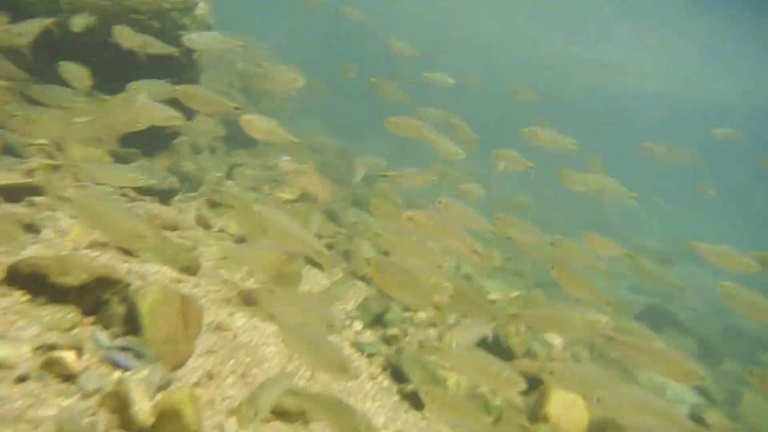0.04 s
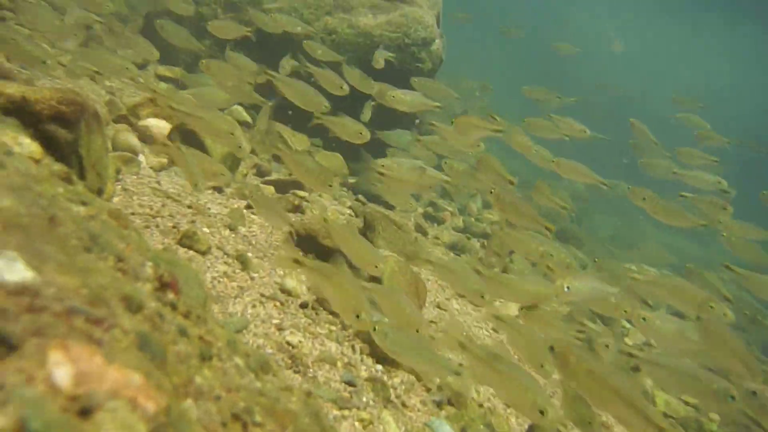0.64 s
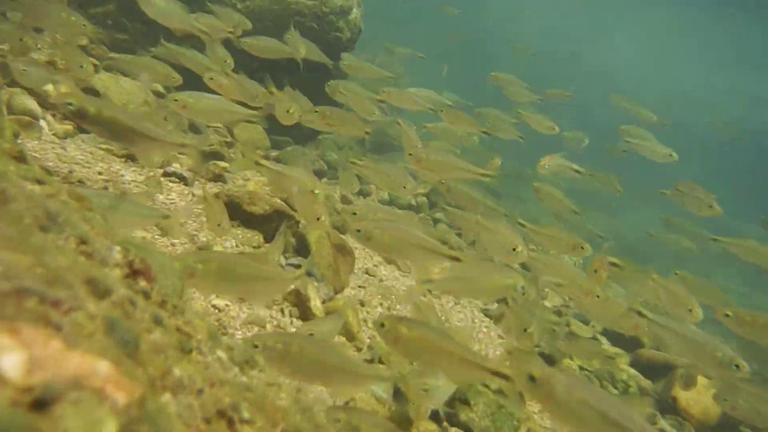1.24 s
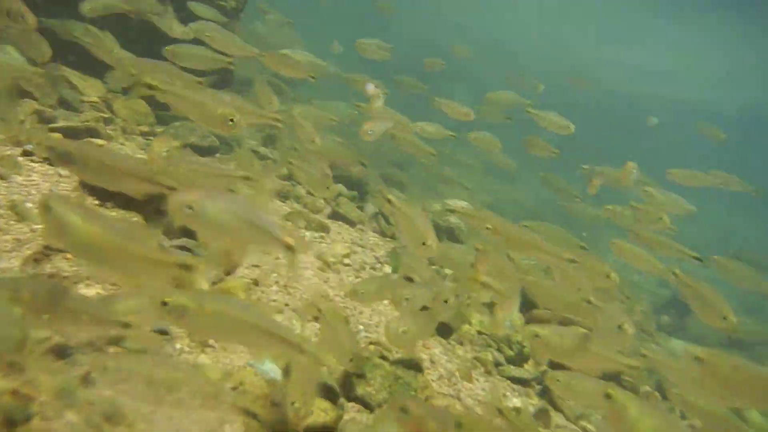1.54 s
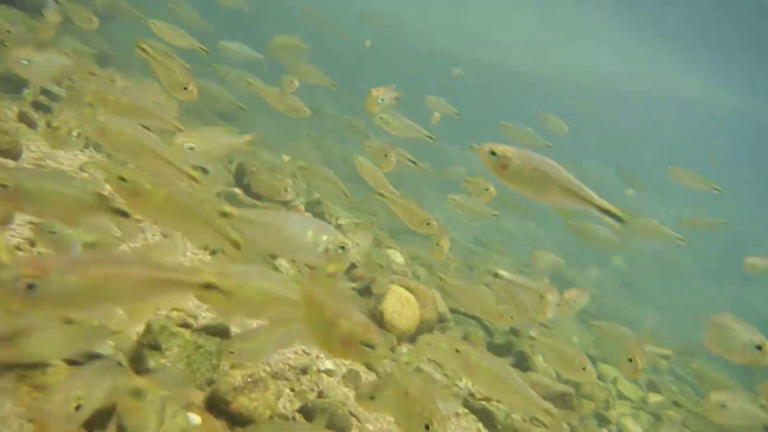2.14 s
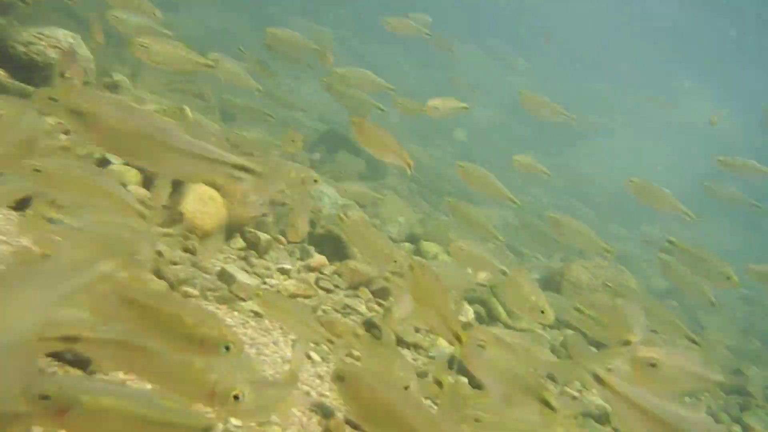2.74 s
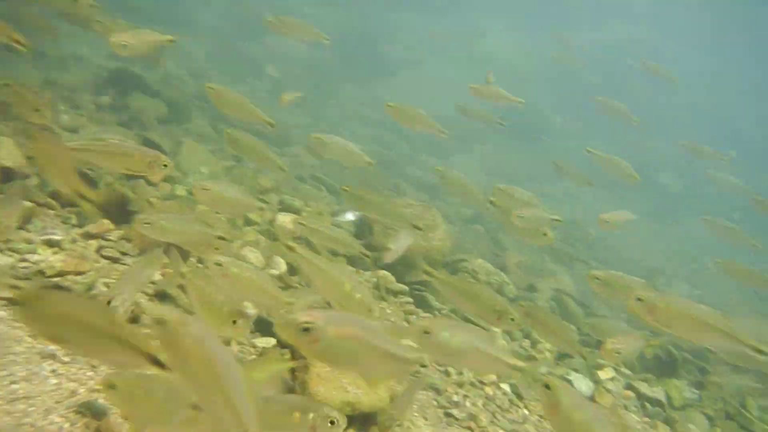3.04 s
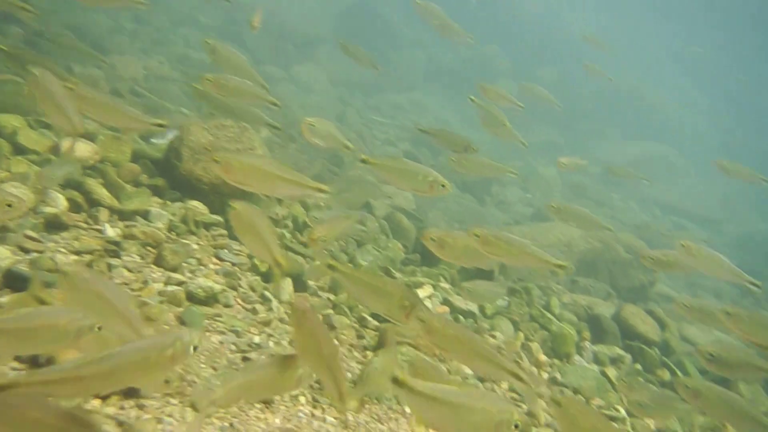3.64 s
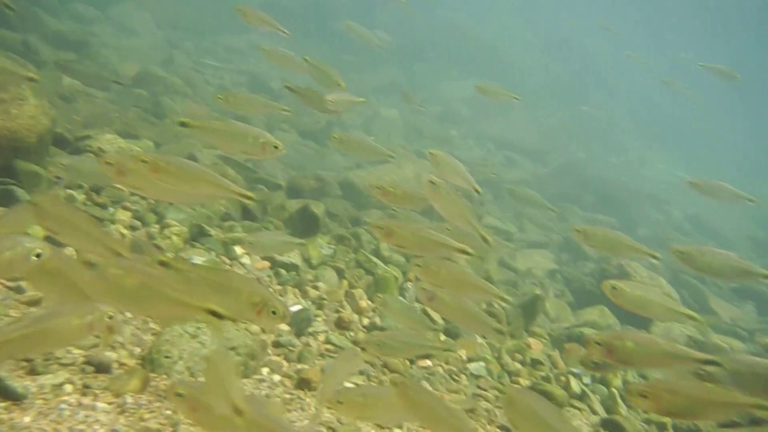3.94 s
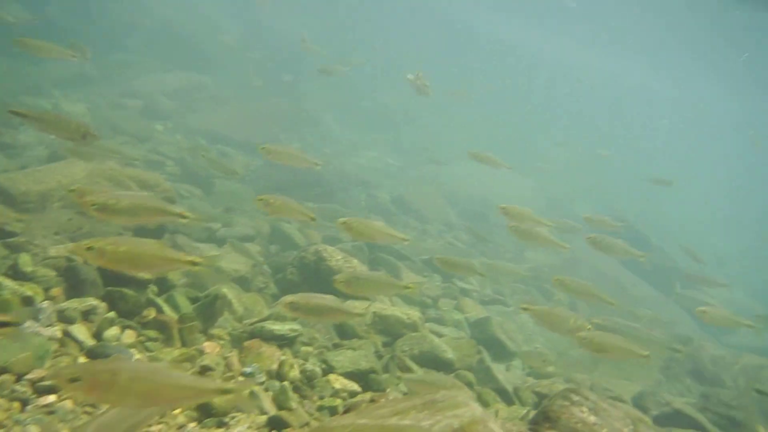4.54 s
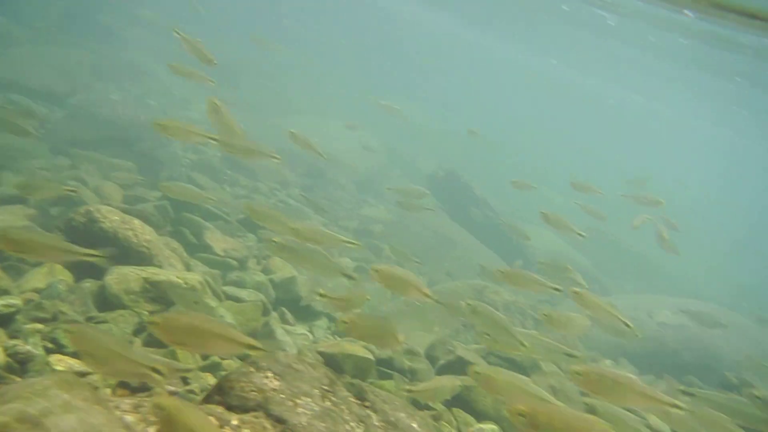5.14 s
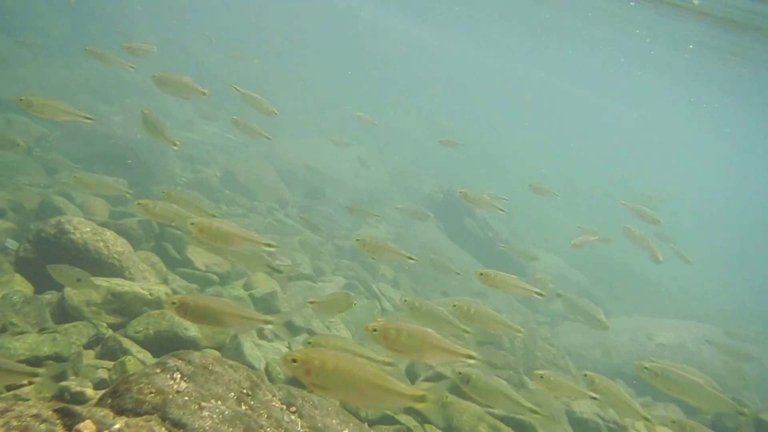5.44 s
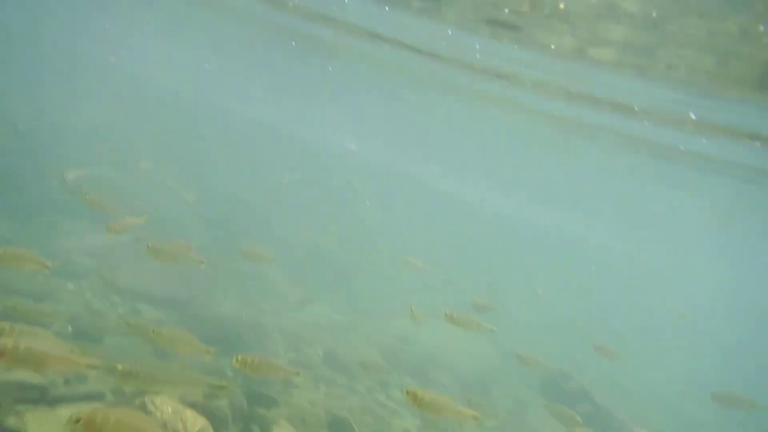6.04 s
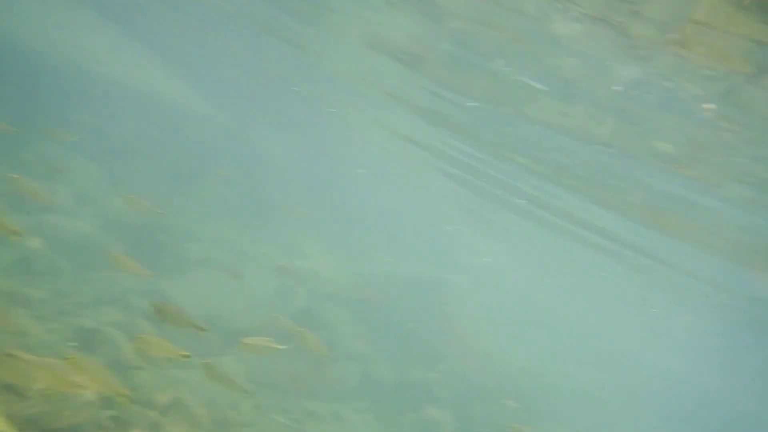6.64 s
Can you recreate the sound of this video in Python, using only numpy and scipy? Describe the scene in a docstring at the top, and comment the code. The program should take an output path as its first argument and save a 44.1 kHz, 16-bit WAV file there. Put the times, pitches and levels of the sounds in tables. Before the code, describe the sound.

Muffled underwater river wash with hollow knocks and rubbing on a camera case, then a small motor's low, rapid ticking in spells.

```python
"""Hollow knocks and surging rubbing on a waterproof camera case held in a shallow river.
Bumps, mostly from a shifting grip, the current's drag and lens motor steps ring its modes, differently
at each of two microphones. Water gulps, bubbles gurgle, pitched pops and taps ring, grit ticks and
scrapes, stones clink. Behind are a dull wash, thin hiss and, late on, a small motor's hum.
The heaviest knocks push the camera's gain down, and the rush creeps back after them."""
import sys
import numpy as np
from scipy import signal
from scipy.fft import rfft, irfft, next_fast_len
from scipy.io import wavfile
from scipy.ndimage import uniform_filter1d, minimum_filter1d, map_coordinates

SR = 44100
rng = np.random.default_rng(int(sys.argv[2]) if len(sys.argv) > 2 else 0)


def to_wav(s):
    """Save 16-bit WAV."""
    ch = np.atleast_2d(s).T  # columns
    pcm = np.round(np.clip(ch, -1, 1) * 32767)  # PCM
    wavfile.write(sys.argv[1], SR, pcm.astype(np.int16))


N = 299880
TIME_S = np.arange(N) / SR

# Each row: frequency in Hz, width in Hz, gain in dB at the left microphone, gain in dB at the right.
CASE_MODES = [(80.6, 14, -31, -33.5), (150, 14, -19.5, -19), (217.1, 55, -15.5, -13),
              (297, 130, -29.5, -16), (400.3, 63, -36.5, -9), (453, 65, -16, -3.5), (525, 32.7, 7, -27),
              (762, 170, -15, -12.5), (1164, 210, -5, -13.5)]
# Dull knocks on the case, including one hard lens motor step.
# Each row: start in seconds, level in dB, left-right bias in dB, hardness in Hz.
CASE_KNOCKS = [(0.024, -4.5, -15, 946), (0.322, 3.5, 13.5, 660), (0.395, -4.5, -5.5, 554),
               (0.461, 3, 0, 600), (0.488, -1.5, -5.5, 503), (0.529, -0.5, 14, 423), (0.603, 5, 0, 648),
               (0.652, 10.5, 12, 559), (0.673, 5.5, 0, 440), (1.064, 1, 0, 702), (1.083, -2.5, 6, 477),
               (1.138, 5.5, -6.5, 710), (1.174, 2, 15, 499), (1.191, -2.5, -2.5, 488),
               (1.249, 3.5, -7, 576), (1.263, 8.5, 8, 508), (1.317, 7.5, -3.5, 688), (1.338, 12, 0, 558),
               (1.562, 13, 5, 492), (2.479, -15, 7, 673), (2.532, -9.5, 1, 590), (3.529, -13, 5, 604),
               (3.997, -10, 15, 710), (4.75, -17, -0.5, 840), (4.945, -14, 9.5, 452), (5.013, -9, 3, 745),
               (5.062, -4.5, 12.5, 496), (5.228, -7.5, -33, 800), (5.241, -5, 12, 720),
               (5.698, -7.5, -7.5, 833), (6.433, -8.5, 20, 810), (6.449, -3.5, -14, 870)]
# Water or grip sliding. Each row: start and end in seconds, level in dB, left-right bias in dB.
RUB_SURGES = [(0.0, 0.009, -24, 5), (0.194, 0.456, -25, 2.5), (0.433, 0.573, -18.5, 4),
              (0.635, 0.679, -13, 3.5), (0.774, 0.838, -24.5, -3), (0.908, 0.918, -23, -5),
              (0.99, 1.276, -18, 3), (1.33, 1.406, -8.5, 3.5), (1.44, 1.542, -13.5, 3),
              (1.58, 1.714, -14, 2), (1.737, 1.888, -34.5, 2), (2.12, 2.253, -33, 2),
              (2.445, 2.541, -24, 2), (2.655, 2.995, -30.5, -4), (3.443, 3.65, -31, 2.5),
              (3.623, 3.872, -26, -7), (3.998, 4.15, -34, -1.5), (4.196, 4.275, -27, -6.5),
              (4.364, 4.502, -28.5, -10.5), (4.582, 4.926, -24, -2), (4.931, 5.045, -25.5, 0),
              (5.597, 5.722, -34.5, -4), (6.598, 6.809, -35, -4)]
# Each row: middle in seconds, peak in dB, pitch in Hz, length in seconds.
WATER_GULPS = [(0.328, -17.5, 201.6, 0.013), (0.505, -16, 157.6, 0.055), (0.555, -19.5, 105.3, 0.035),
               (0.676, -5.5, 175.6, 0.024), (0.821, -11, 181, 0.0095), (1.21, -17.5, 136.7, 0.017),
               (1.262, -15.5, 187, 0.031), (1.325, -15.5, 193.5, 0.028), (1.7, -15.5, 202.6, 0.041),
               (2.48, -24, 119, 0.019), (2.535, -25, 175.4, 0.044), (5.289, -26.5, 136.5, 0.0099),
               (6.458, -26, 90.5, 0.017)]
# Each row: start in seconds, level in dB, pitch in Hz, t60 in seconds.
PITCHED_POPS_AND_TAPS = [(0.014, -10, 1010, 0.0056), (0.322, -26, 1276, 0.022), (0.603, -13, 1087, 0.0089),
                         (0.639, -13, 1370, 0.01), (0.803, -16.5, 1273, 0.018), (1.061, -11.5, 1218, 0.039),
                         (1.138, -8, 1150, 0.036), (1.19, -16, 1136, 0.038), (1.249, -13.5, 1163, 0.046),
                         (1.314, -13.5, 1225, 0.054), (1.433, -11.5, 1190, 0.028), (1.492, -18, 1230, 0.04),
                         (1.56, -17.5, 1265, 0.018), (1.681, -11.5, 1175, 0.044), (2.578, -34, 1180, 0.03),
                         (5.697, -21.5, 727, 0.039), (5.813, -23.5, 1850, 0.011),
                         (6.447, -21, 1500, 0.0053)]
# Lens motor runs. Each row: start and end in seconds, level in dB.
STEP_SPELLS = [(0.026, 0.6, -15), (0.761, 1.0, -14), (1.811, 2.2, -15.5), (2.212, 2.7, -17.5),
               (2.712, 3.93, -16), (5.132, 5.99, -15), (6.199, 6.8, -17)]
# Each entry: time in seconds of a step that lands harder.
HARD_STEPS_S = [1.945, 2.012, 2.18, 2.446, 2.712, 2.846, 3.38, 5.165, 5.5, 5.966, 6.233, 6.366, 6.666]
# Each row: time in seconds, level in dB, clack offset in dB.
GRIT_HITS = [(0.156, -27, -6.5), (0.17, -30, -9), (0.323, -42, 7), (0.602, -36, 5.5), (0.616, -25.5, -7),
             (0.6396, -29, -8), (0.6566, -29.5, 2.5), (1.061, -42, 1.5), (1.1376, -32, 3),
             (1.1573, -29, -10.5), (1.3038, -33.5, -3), (1.3188, -28, 8.5), (1.3408, -26, -0.5),
             (1.5602, -30, 3), (1.9738, -39, -9), (2.0027, -34.5, -25.5), (5.1724, -41.5, -1),
             (5.2396, -36, 7.5), (5.5035, -40.5, -15.5), (5.8116, -55.5, 14.5), (6.368, -56, 10),
             (6.433, -55, 10.5), (6.449, -45, 3.5), (6.634, -57, 10.5)]
# Each row: start and end in seconds, level in dB.
SAND_SCRAPES = [(0.65, 2.3, -65.5), (0.367, 0.601, -64.5), (0.622, 0.687, -56), (1.223, 1.407, -62),
                (1.493, 1.579, -59), (1.612, 1.698, -47.5)]
# Each row: start in seconds, level in dB.
STONE_CLINKS = [(0.156, -35), (5.241, -23.5)]
# Each row: frequency in Hz, gain in dB, t60 in seconds.
STONE_MODES = [(1980, 2.5, 0.014), (3330, -4.5, 0.01), (4440, -15.5, 0.011)]
# Clusters of large bubbles. Each row: middle and length in seconds, level in dB.
GURGLE_CLUSTERS = [(4.777, 0.14, -32), (5.021, 0.11, -28), (5.83, 0.088, -35)]
# Swarms of fine bubbles. Each row: middle and length in seconds, boost in dB.
FIZZ_SWARMS = [(1.501, 2.1, 3), (3.325, 0.18, 8.5), (4.455, 0.7, 7), (5.582, 0.28, 8)]
# Noise spectra. Each row: frequency in Hz, relative density in dB.
TICK_SPECTRUM = [(3000, -37.5), (5000, -22), (7300, -14.5), (8500, 2), (9800, -9), (11000, 2.5),
                 (13000, -15), (16000, -13.5)]
CLACK_SPECTRUM = [(600, -29), (1400, 6), (2000, 7), (2550, -7.5), (3400, -7.5), (3800, -16), (4500, -13),
                  (5100, -35), (6000, -36.5)]
GURGLE_SPECTRUM = [(50, -84), (300, -30), (520, -4.5), (680, 9.5), (850, -4), (1100, -31), (2000, -48.5),
                   (5000, -110)]
WASH_SPECTRUM = [(25, -9.5), (80, 6), (200, 7.5), (280, -1.5), (450, 11), (780, 8), (1000, 1), (1300, 5),
                 (1700, -10), (2200, -23), (2500, -27.5), (3300, -27), (4500, -32.5), (5000, -55)]
FIZZ_SPECTRUM = [(600, -28.5), (1100, 1.5), (1400, -1), (1900, 1), (2250, -10), (2500, -30.5), (3300, -29),
                 (5000, -53.5)]
HISS_SPECTRUM = [(1000, -10.5), (4500, -8), (5200, -11), (7400, -8.5), (8300, 1.5), (9800, 1), (10700, 3),
                 (13000, 2), (15800, 6)]
# Bubble noise. Each row: frequency in Hz, left-right correlation (clipped to +-1 in use).
WATER_CORRELATION = [(100, 0.38), (400, 0.4), (700, 1), (1400, -1.09), (2000, 0.45), (3100, 0.00026),
                     (6000, -0.51)]


def knocks(attack_s=0.0027, free_ring_hz=596, damping_power=1.4):
    """Dull knocks on the case: the harder the contact, the quicker and shorter the ring."""
    out, t = np.zeros((2, N)), np.arange(SR // 10) / SR
    for start_s, db, balance_db, hard_hz in CASE_KNOCKS:
        damping = (hard_hz / free_ring_hz) ** damping_power
        onset = 1 - np.exp(-t * damping ** 2 / attack_s)
        ring = case_impulse(hard_hz, damping) * panned(balance_db) * onset
        add(out, start_s, amp(db) * ring / np.abs(ring).max())
    return filtered(out, lambda hz: 1j * hz / (1j * hz + 110))  # high-pass: no offset or low rumble


def rubbing(current_db=-37.5, rise_share=0.46, release_s=0.027, rough_db=3.0, trim_db=-3.5):
    """Eddies and fingers drag over the case in uneven shoves; each surge builds and lets go."""
    power = (amp(current_db - 1.6 * wobble(7.5)) * panned(-2)) ** 2
    for start_s, end_s, db, balance_db in RUB_SURGES:
        rise = np.clip((TIME_S - start_s) / (rise_share * (end_s - start_s)), 0, 1)
        release = np.exp(-np.maximum(TIME_S - end_s, 0) / release_s)
        power += (amp(db) * rise * release * panned(balance_db)) ** 2
    force = rng.standard_normal(N) + 0.55 * rng.standard_normal((2, N))  # shared + per side
    force *= amp(rough_db * wobble(130) + 0.57 * wobble(28))
    ring = case_ring(force, hard_hz=550, damping=1.115)
    bass = filtered(ring.mean(axis=0), lambda hz: hz < 430)
    return ring / bass.std() * amp(trim_db) * np.sqrt(power)


def gulps(fall=0.245):
    """A shove of water swells and fades in a few cycles, sinking in pitch."""
    out, t = np.zeros((2, N)), np.arange(-SR // 10, SR // 10) / SR
    for middle_s, db, hz, length_s in WATER_GULPS:
        glide_hz = hz * np.exp(-fall * np.tanh(t / length_s))
        phase = 2 * np.pi * (np.cumsum(glide_hz) / SR + rng.random())
        add(out, middle_s + t[0], amp(db) * np.sin(phase) * np.exp(-(2 * t / length_s) ** 2))
    return out


def pops_and_taps(attack_s=0.00084, detune=0.09, neighbour_db=-8):
    """Pitched pops and short taps on the case ring briefly; two weaker nearby tones blur each pitch."""
    out, t = np.zeros((2, N)), np.arange(SR // 10) / SR
    onset = 1 - np.exp(-(t / attack_s) ** 2)
    for start_s, db, hz, t60_s in PITCHED_POPS_AND_TAPS:
        neighbour_hz = hz * np.exp(detune * rng.standard_normal((2, 1)))
        neighbours = np.sin(2 * np.pi * neighbour_hz * t).sum(axis=0)
        ring = np.sin(2 * np.pi * hz * t) + amp(neighbour_db) * neighbours
        add(out, start_s, amp(db - 60 * t / t60_s) * ring * onset)
    return out


def lens_motor(frame_hz=29.97, jitter_s=0.00082, attack_s=0.0023, scatter_db=1.85, hard_db=6):
    """In spells, the motor steps once a frame, ringing the case through a springy mount, mostly left."""
    def mount(hz, centre_hz=600, width_hz=300):
        return resonance(hz, centre_hz, width_hz) ** 2

    out, t = np.zeros((2, N)), np.arange(SR // 10) / SR
    onset = 1 - np.exp(-(t / attack_s) ** 2)
    ring = filtered(case_impulse(hard_hz=1040, damping=1.43), mount) * panned(7.9) * onset
    clack = amp(-17) * case_impulse(hard_hz=1380, damping=4.5)  # bypasses the mount
    tick = amp(-47 - 60 * t / 0.004) * np.sin(2 * np.pi * 8700 * t)  # t60 of 4 ms
    step = ring / np.abs(ring).max() + clack + tick
    for start_s, end_s, db in STEP_SPELLS:
        for step_s in np.arange(start_s, end_s, 1 / frame_hz):
            size, lag = rng.standard_normal(2)
            is_hard = np.abs(step_s - np.array(HARD_STEPS_S)).min() < 0.5 / frame_hz
            accent_db = hard_db if is_hard else scatter_db * size
            add(out, step_s + jitter_s * lag, step * amp(db + accent_db))
    return out


def grit(tick_t60_s=0.01, clack_t60_s=0.029, trim_db=-5, clack_boost_db=4):
    """Grains strike the shell: a thin tick over a longer clack."""
    out, t = np.zeros((2, N)), np.arange(SR // 20) / SR
    for hit_s, db, offset_db in GRIT_HITS:
        tick = coloured(rng.standard_normal((2, len(t))), TICK_SPECTRUM) * amp(-60 * t / tick_t60_s)
        clack = coloured(rng.standard_normal((2, len(t))), CLACK_SPECTRUM) * amp(-60 * t / clack_t60_s)
        add(out, hit_s + 0.001, amp(db + trim_db) * (tick + amp(offset_db + clack_boost_db) * clack))
    return out


def clinks(attack_s=0.0004):
    """A small stone touches the case and rings briefly."""
    out, t = np.zeros((2, N)), np.arange(SR // 10) / SR
    ring = sum(amp(db - 60 * t / t60_s) * np.sin(2 * np.pi * hz * t) for hz, db, t60_s in STONE_MODES)
    onset = 1 - np.exp(-(t / attack_s) ** 2)
    for start_s, db in STONE_CLINKS:
        add(out, start_s, amp(db) * ring * onset)
    return out


def scrapes(grain_db=6.5, rasp_db=2):
    """Fine sand drags over the shell in a dense run of tiny catches."""
    strokes = np.zeros(N)
    for start_s, end_s, db in SAND_SCRAPES:
        progress = np.clip((TIME_S - start_s) / (end_s - start_s), 0, 1)
        strokes += amp(db) * np.sqrt(np.abs(np.sin(np.pi * progress)))
    catches = rng.standard_normal((2, N)) * amp(grain_db * wobble(400))
    return strokes * (coloured(catches, TICK_SPECTRUM) + amp(rasp_db) * coloured(catches, CLACK_SPECTRUM))


def gurgles():
    """Large bubbles pass in clusters with a hollow churning."""
    clusters = sum(amp(db) * swell(middle_s, length_s) for middle_s, length_s, db in GURGLE_CLUSTERS)
    return bubble_noise(GURGLE_SPECTRUM, churn_db=4) * clusters


def river(wash_db=-37.5, fizz_db=-54, drift_db=2.0):
    """Countless far bubbles merge into a muffled wash; finer ones drift by in swarms."""
    swarm_db = sum(db * swell(middle_s, length_s) for middle_s, length_s, db in FIZZ_SWARMS)
    swarm_db += drift_db * wobble(4.8)
    wash = bubble_noise(WASH_SPECTRUM, churn_db=1.5) * amp(wash_db)
    fizz = bubble_noise(FIZZ_SPECTRUM, churn_db=2.0) * amp(fizz_db + swarm_db)
    return wash + fizz


def hum(hz=297.0, start_s=5.68, rise_s=0.13, rms_db=-41.5):
    """A small motor starts and holds a slightly unsteady tone."""
    running = np.clip((TIME_S - start_s) / rise_s, 0, 1)
    tone = np.sqrt(2) * np.sin(2 * np.pi * hz * TIME_S + 0.6 * wobble(6))
    return tone * amp(rms_db) * running * panned(-2.0)


def hiss(rms_db=-60.0):
    """Thin microphone hiss, a little stronger on the right."""
    return coloured(rng.standard_normal((2, N)), HISS_SPECTRUM) * amp(rms_db) * panned(-2.5)


def case_ring(force, hard_hz, damping, contact_loss=1.065):
    """The case rings at both microphones; a soft contact barely stirs its upper modes."""
    def response(hz):
        modes = sum(amp([[left_db], [right_db]]) * resonance(hz, mode_hz, width_hz * damping)
                    for mode_hz, width_hz, left_db, right_db in CASE_MODES)
        s = 1j * hz / hard_hz
        return modes / (1 + contact_loss * s + s * s) ** 2  # contact low-pass
    return filtered(force, response)


def case_impulse(hard_hz, damping):
    """The ring of one push on the case, peak 1."""
    ring = case_ring(signal.unit_impulse(SR // 10), hard_hz, damping)
    return ring / np.abs(ring).max()


def bubble_noise(spectrum, churn_db):
    """Stereo noise of rms 1 whose strength churns quickly."""
    def mid_side(hz):
        angle = np.arccos(np.clip(along(WATER_CORRELATION, hz), -1, 1)) / 2
        return amp(along(spectrum, hz)) * [np.cos(angle), np.sin(angle)]
    churn = rng.standard_normal((2, N)) * amp(churn_db * wobble(60))
    mid, side = filtered(churn, mid_side)
    return unit_rms(np.array([mid + side, mid - side]))


def resonance(hz, centre_hz, width_hz):
    """Band-pass response of one mode."""
    return 1j * hz * width_hz / (centre_hz ** 2 - hz ** 2 + 1j * hz * width_hz)


def amp(db):
    """Decibels to gain."""
    return 10 ** (np.asarray(db) / 20)


def unit_rms(x):
    """Scale to rms 1."""
    return x / np.sqrt(np.mean(x ** 2) + 1e-20)


def along(points, hz):
    """Read (Hz, value) points on a log axis."""
    knots_hz, values = np.transpose(points)
    return np.interp(np.log(hz + 1), np.log(knots_hz + 1), values)


def wobble(rate_hz):
    """Smooth random curve, rate_hz knots a second."""
    return map_coordinates(rng.standard_normal(int(N * rate_hz / SR) + 4), [TIME_S * rate_hz])


def swell(middle_s, length_s):
    """Gaussian bump, peak 1."""
    return np.exp(-(2 * (TIME_S - middle_s) / length_s) ** 2)


def filtered(x, response):
    """Apply a complex frequency response."""
    n = x.shape[-1]
    n_fft = next_fast_len(n + 4096)
    return irfft(rfft(x, n_fft) * response(np.fft.rfftfreq(n_fft, 1 / SR)), n_fft)[..., :n]


def coloured(x, spectrum):
    """Shape x by (Hz, dB) points, then scale to rms 1."""
    return unit_rms(filtered(x, lambda hz: amp(along(spectrum, hz))))


def panned(balance_db):
    """Stereo gains for a left-minus-right level."""
    gains = amp([[balance_db / 2], [-balance_db / 2]])
    return gains / np.sqrt(np.mean(gains ** 2))


def add(track, start_s, sound):
    """Mix a sound into the track."""
    start = max(round(start_s * SR), 0)
    part = track[:, start:start + sound.shape[-1]]
    part += sound[..., :part.shape[-1]]


def scene():
    """All sources at the two microphones."""
    water = river() + rubbing() + gulps() + gurgles()
    contacts = knocks() + pops_and_taps() + clinks() + grit() + scrapes()
    return water + contacts + hum() + hiss() + lens_motor()


def record(dry, ceiling_db=-0.5, recovery_db_per_s=15, start_duck_db=5, top_hz=15900):
    """Camera gain starts low, drops on peaks over the ceiling and creeps back; a low-pass follows."""
    peak_db = 20 * np.log10(np.abs(dry).max(axis=0) + 1e-9)
    over_db = np.maximum(peak_db - ceiling_db, 0)
    recovered_db = recovery_db_per_s * TIME_S
    duck_db = np.maximum.accumulate(np.maximum(over_db + recovered_db, start_duck_db)) - recovered_db
    gain = uniform_filter1d(minimum_filter1d(amp(-duck_db), size=100), size=100)
    return filtered(dry * gain, lambda hz: hz < top_hz)


dry = scene()
out = record(dry)
to_wav(out)
```